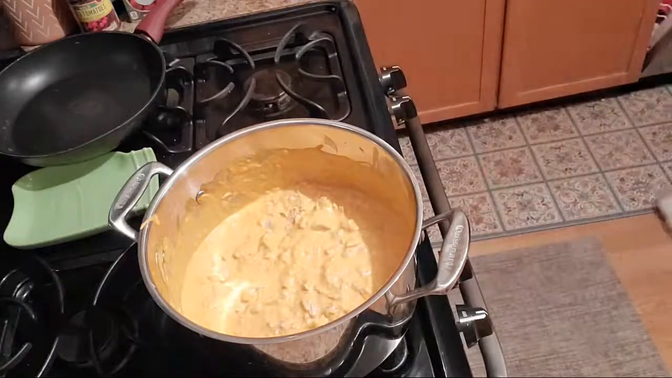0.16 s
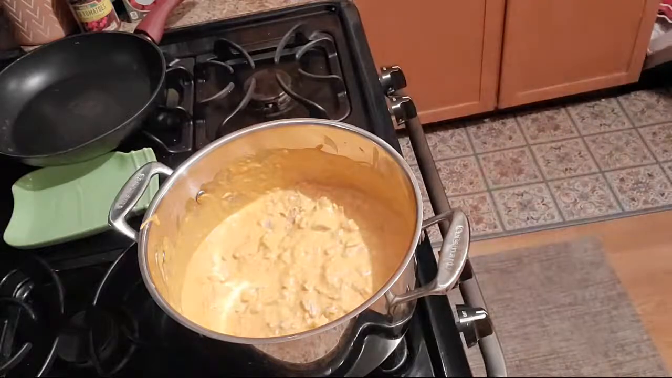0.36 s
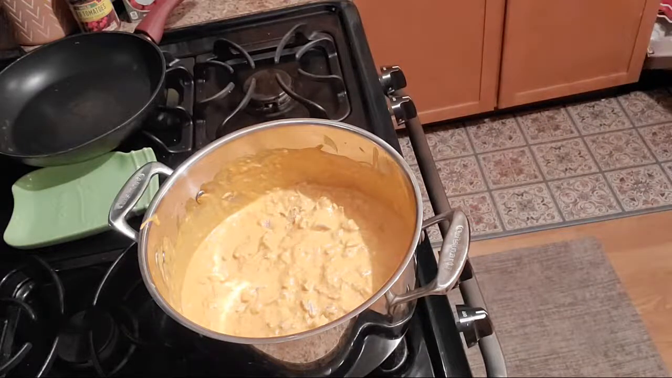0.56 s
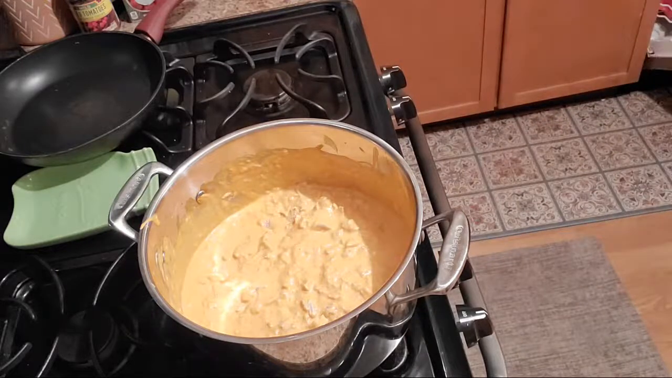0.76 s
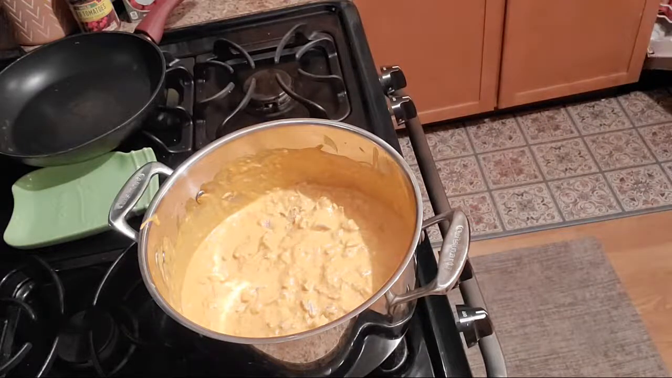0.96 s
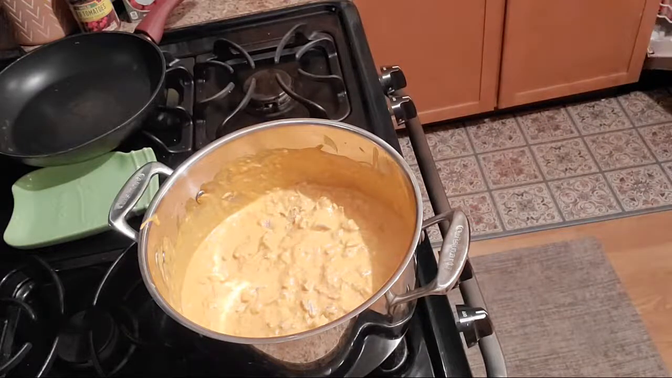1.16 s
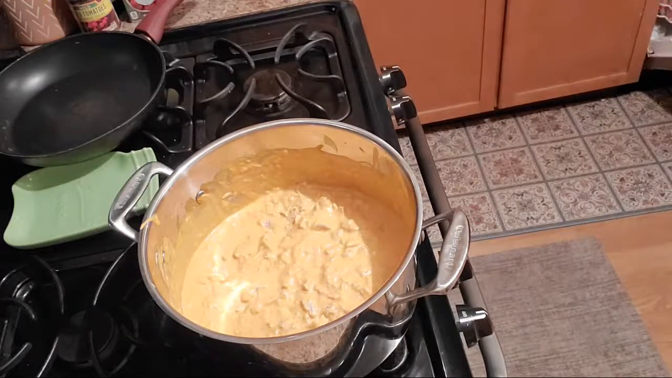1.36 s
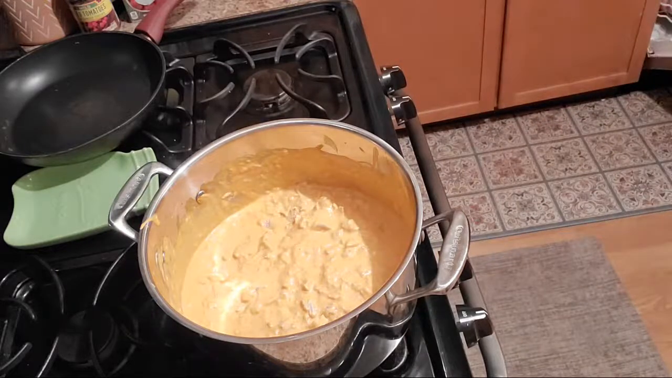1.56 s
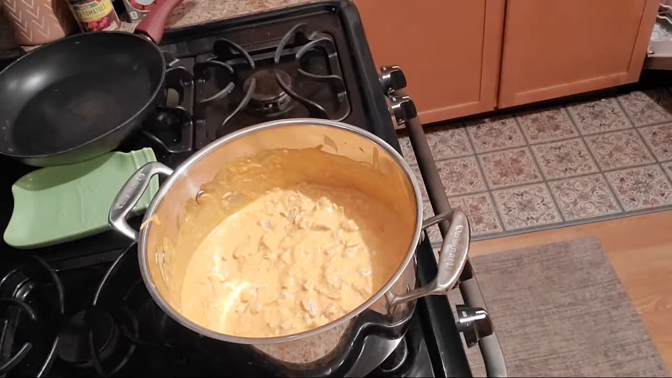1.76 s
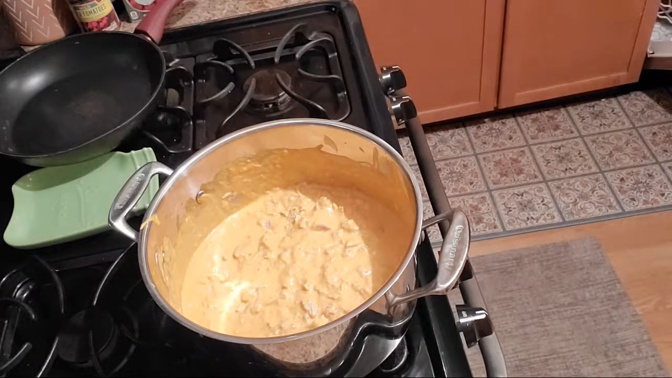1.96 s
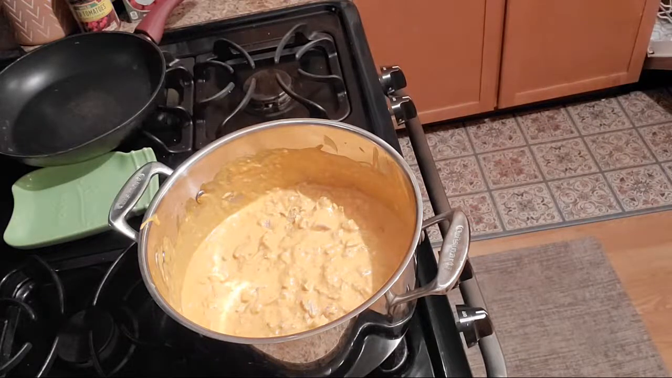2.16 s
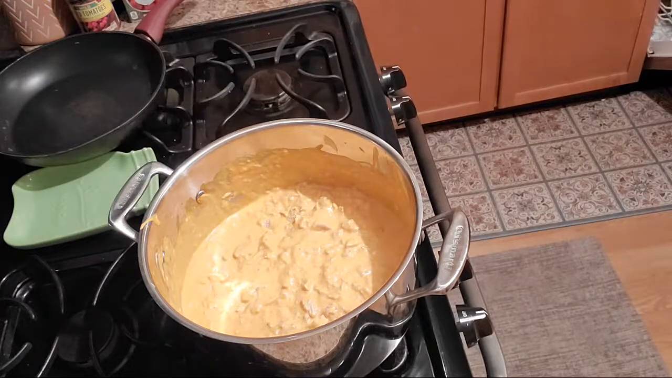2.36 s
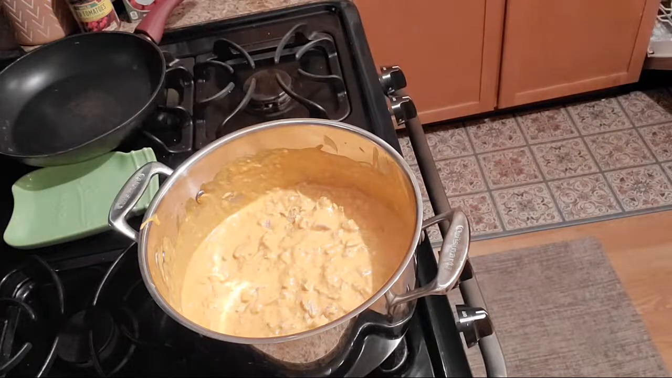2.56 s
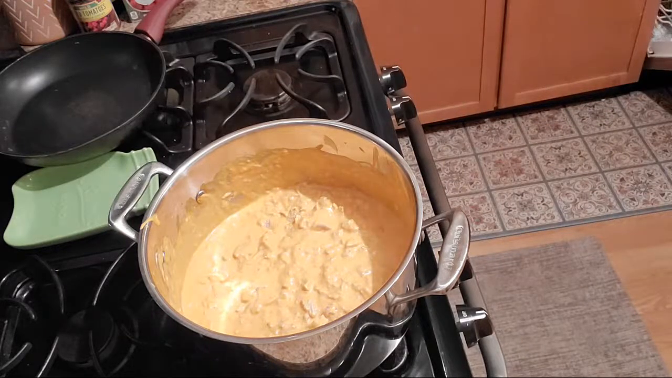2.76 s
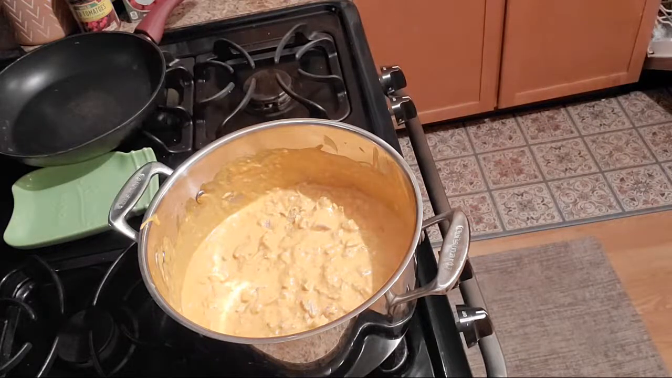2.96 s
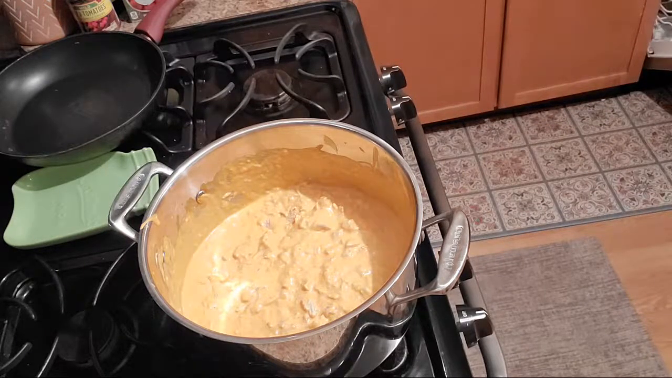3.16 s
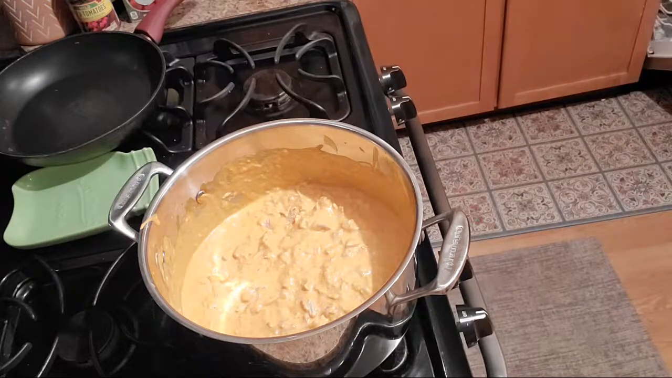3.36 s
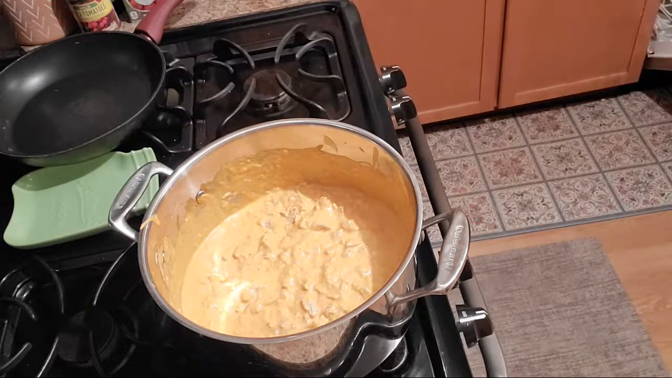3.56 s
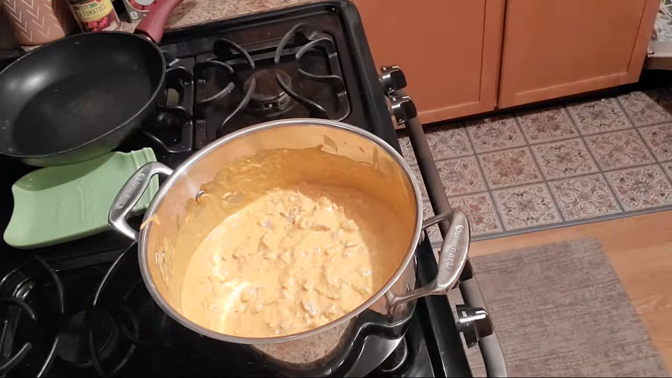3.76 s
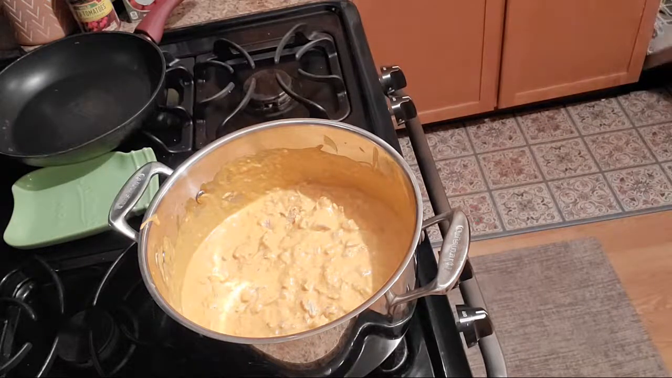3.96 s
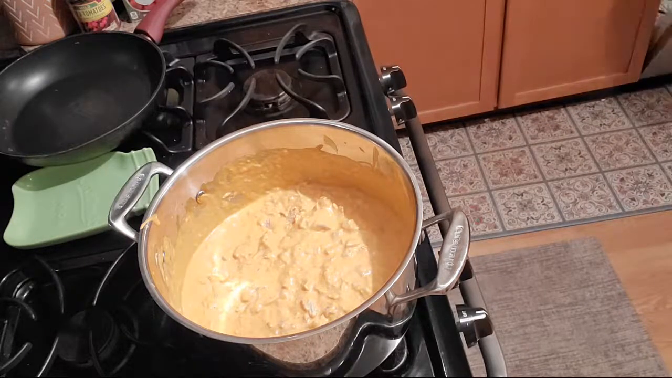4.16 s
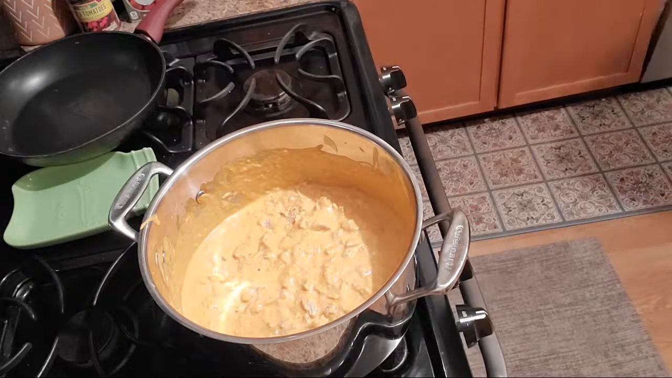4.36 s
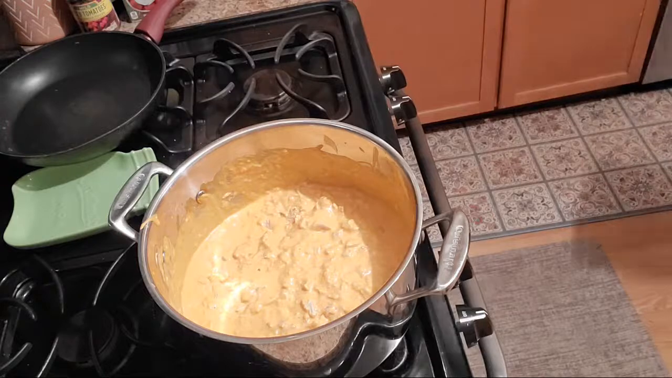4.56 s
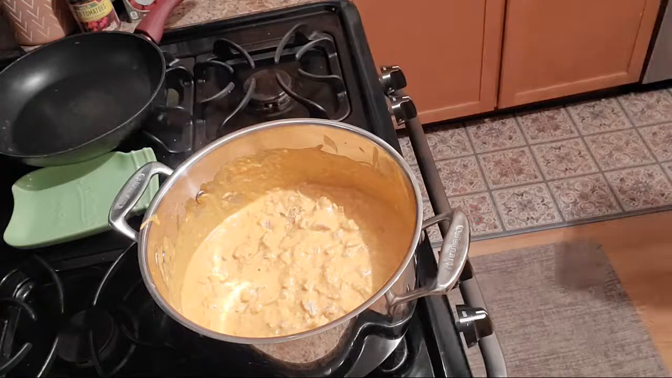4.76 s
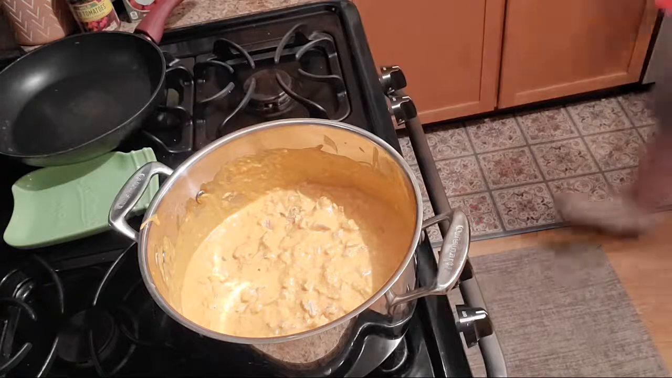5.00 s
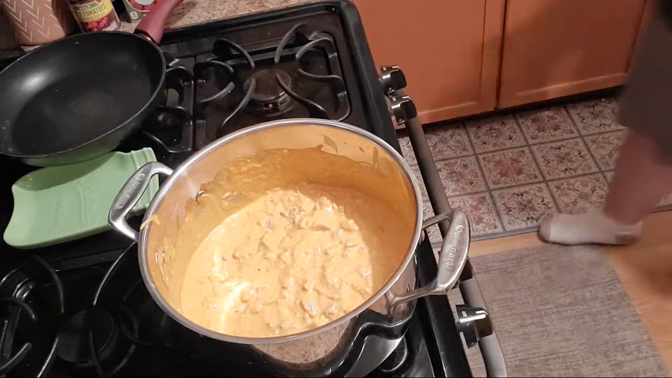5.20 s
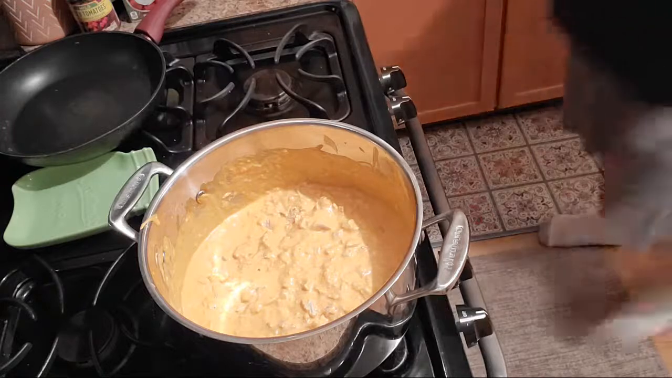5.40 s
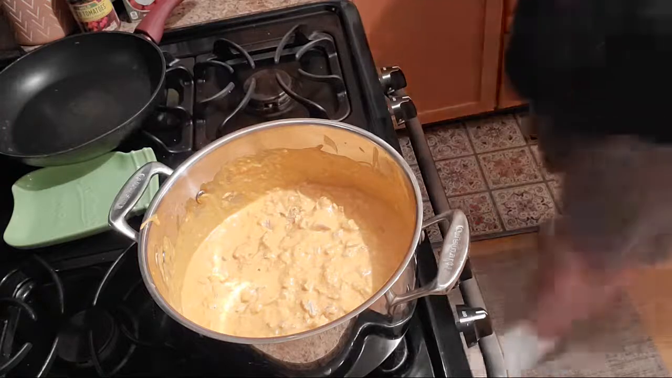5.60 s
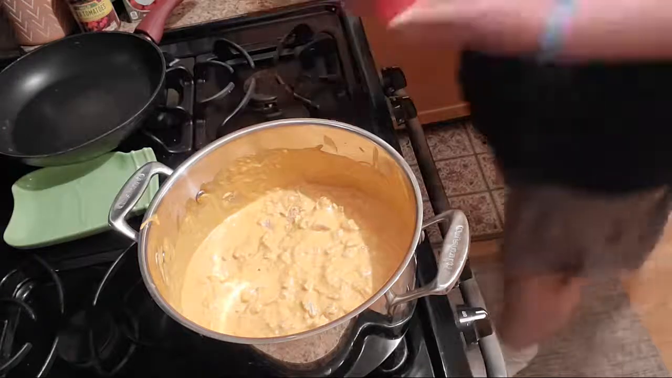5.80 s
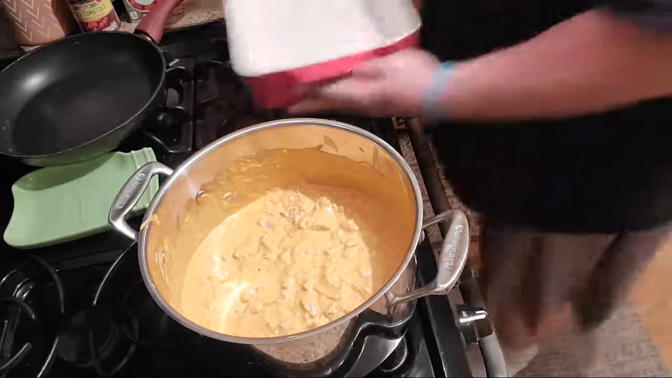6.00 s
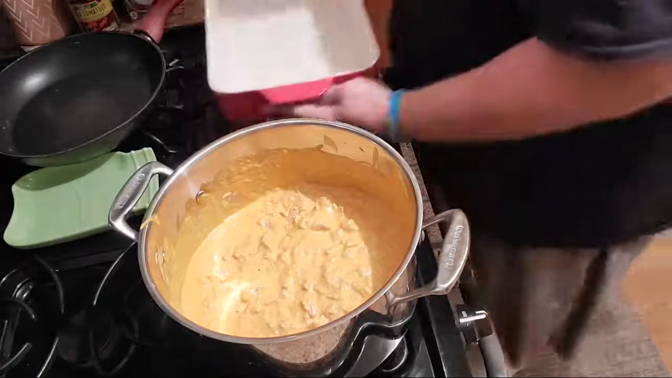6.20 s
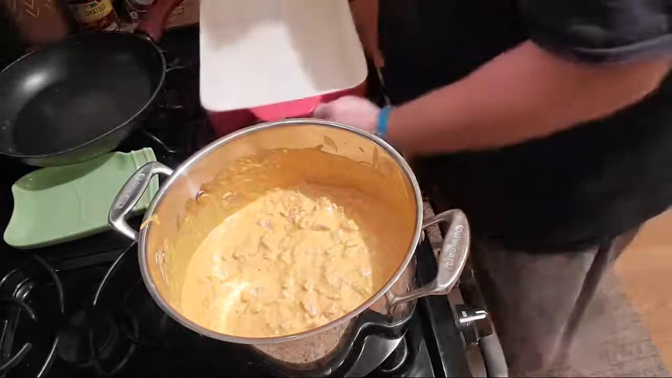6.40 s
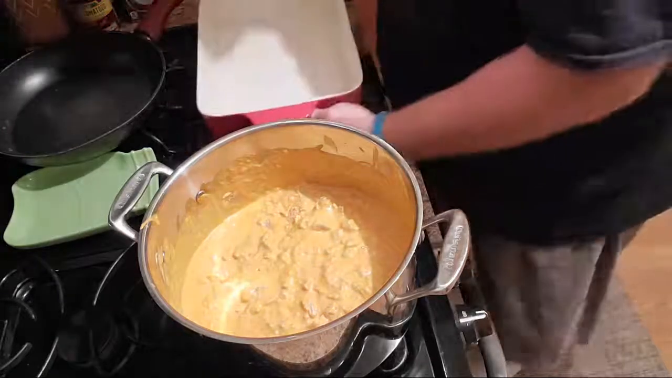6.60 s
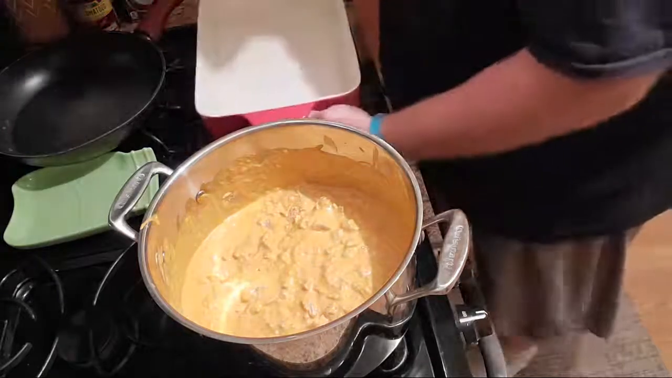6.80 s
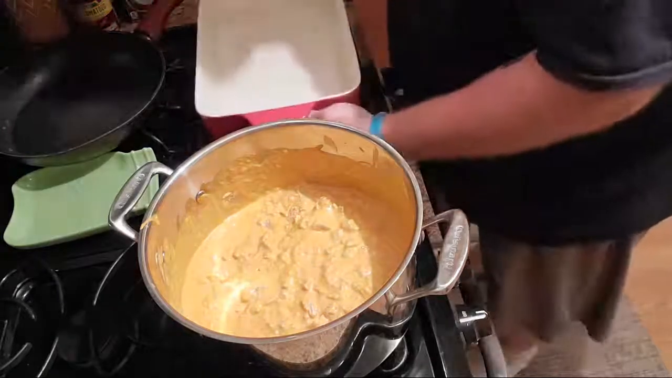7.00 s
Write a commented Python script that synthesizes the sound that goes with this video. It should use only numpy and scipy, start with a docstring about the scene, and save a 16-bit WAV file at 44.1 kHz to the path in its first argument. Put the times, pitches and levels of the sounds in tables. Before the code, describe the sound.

A quiet small kitchen with a soft low rush of air, a faint unsteady hum and barely audible hiss. From 0 to 0.4 seconds there are faint slides, a thin squeak and small dish taps in a low cupboard a few metres away. Muffled crockery clacks come in little groups around 0.8, 1.1, 1.45 and 2.0 seconds, with short scrapes from 2.3 to 2.8. Knocks gather near 3.0, and at 3.3 to 3.6 a louder run of clearer, hard clunks arrives over low bumps. A wooden door bangs sharply at 3.9, something slides, smaller bumps follow at 4.3, and a second door shuts at 4.5 with a deep cupboard boom and slight rattles until 4.8. Near quiet follows. At 6.47 a ceramic baking dish strikes the iron stove grate, loud and close, with a brief clang; duller settling knocks follow at 6.6 and 6.75, decaying into room air.

```python
"""A small kitchen: a ceramic baking dish is dug out of a low cupboard, a few metres from the microphone.
Dishes clack and doors shut as coloured pulses, each with dense decaying echoes; slides are random slips.
Decaying modes give the boom of the cupboard and the clang of the dish set down on the iron stove grate.
Filtered noise makes the rush of air and faint high hiss; unsteady sines make the low hum and thin squeaks."""
import sys
import numpy as np
from scipy import signal
from scipy.fft import rfft, irfft
from scipy.io import wavfile
from scipy.ndimage import uniform_filter1d, map_coordinates

SR = 44100
rng = np.random.default_rng(int(sys.argv[2]) if len(sys.argv) > 2 else 0)


def file_out(sig):
    """Save sig as 16-bit WAV at sys.argv[1]."""
    # one column per channel
    cols = np.atleast_2d(sig).T
    # limit, then scale
    lim = np.clip(cols, -1, 1)
    pcm = np.round(lim * 32767).astype(np.int16)
    wavfile.write(sys.argv[1], SR, pcm)


N = 310531
TIME = np.arange(N) / SR  # s, the whole scene
RING_TIME = np.arange(SR) / SR  # s, one second of decay

# All levels are relative.
# Spectrum of the steady air noise: [f/Hz, level/dB]
AIR_COLOUR = [(25, -21.5), (45, -6), (80, -6.5), (125, -10.5), (163, -1), (215, -13.5), (250, -4.5),
              (330, -5.5), (470, -9.5), (580, -21), (1100, -33), (2500, -48), (7700, -54.5), (16000, -45)]
# Faint fuzzy whines in the air noise: [f/Hz, width/Hz, level/dB]
AIR_PEAKS = [(1860, 71, 11), (3440, 320, 9)]
# Course of the air noise: [t/s, level/dB]
AIR_LEVEL = [(0, -48), (1.8, -51.5), (3, -49.5), (5.1, -50.5), (5.7, -51)]
# Partials of the hum, about which the level wavers: [f/Hz, level/dB]
HUM = [(163, -57), (296, -84.5)]
# Faint high hiss that swells and fades: [t of the middle/s, length/s, level/dB]
HISS_SWELLS = [(0.173, 0.48, -71.5), (0.38, .16, -68.5), (0.66, 0.71, -68.5), (1.23, .36, -76.5),
               (4.23, 0.87, -63), (5.25, 0.21, -67), (5.538, 0.46, -71.5), (5.937, 0.48, -76.5),
               (6.24, .1, -76.5), (6.73, 0.27, -68.5)]
# Spectrum of the high hiss: [f/Hz, level/dB]
HISS_COLOUR = [(7500, -35.5), (9300, -3), (11300, 1.5), (12500, -1), (16000, -1)]
# Thin squeaks: [t of the middle/s, length/s, level/dB, f/Hz]
SQUEAKS = [(0.145, 0.19, -74, 3090), (0.644, 0.32, -77, 3480)]
# Things sliding on the shelf: [t/s, length/s, level/dB]
SLIDES = [(0.04, 0.3, -62), (0.302, 0.19, -56.5), (2.291, 0.18, -54.5), (2.547, 0.11, -56.5),
          (2.636, 0.14, -55), (3.826, .1, -51), (4.147, 0.19, -51), (4.278, 0.032, -43), (4.3, 0.14, -67)]
# Spectrum of the slips: [f/Hz, level/dB]
SLIDE_COLOUR = [(200, 14), (600, 25), (1100, 10), (1800, -3), (3000, -12), (5000, -26), (8000, -26.5),
                (16000, -32.5)]
# Doors bump and shut: [t/s, level/dB, treble loss/(dB per octave), bass weight/dB, f of the part touched/Hz]
DOOR_BLOWS = [ (3.916, -12, 11.5, -18, 1385), (3.930, -11.5, 8.5, -33, 355),
              (3.964, -22.5, 7.5, -10.5, 1830), (4.208, -39, 9, -27, 2550), (4.279, -20.5, 19.5, -31, 660),
              (4.321, -33.5, 7.5, -32.5, 1990), (4.353, -33.5, 6.5, -9.5, 1820),
              (4.486, -27.5, 3.5, -12, 3100), (4.491, -13.5, 16.5, -18, 712), (4.515, -17, 8.5, -18.5, 628),
              (4.699, -35.5, 5.5, -3.5, 10700), (4.794, -32, 6.5, -20, 2530)]
# Spectrum of a door blow: [f/Hz, level/dB]
DOOR_COLOUR = [(30, -18), (60, 21.5), (130, 24), (260, 13), (500, 7), (750, 3), (1200, 0.5), (2000, 0),
               (3200, 0), (5000, -0.5), (7000, -6), (11500, 7), (16000, 6.5)]
# Broad resonances of the doors: [f/Hz, width/Hz, level/dB]
DOOR_PEAKS = [(122.6, 20.1, 2.84), (234, 21, 10.2), (355, 10, 2.6), (512, 92, 2.1), (598, 29, 1.3),
              (717, 14, 4.87)]
# Heavy bumps that shake cupboard and floor: [t/s, level/dB, f above which the push softens/Hz]
THUDS = [(3.111, -31, 158), (3.170, -31, 108), (3.375, -30, 120), (3.922, -36.5, 260), (4.284, -38.5, 130),
         (4.497, -17.5, 130), (4.544, -15.5, 88), (4.672, -40, 91)]
# Modes of the cupboard and floor: [f/Hz, level/dB, t60/s]
CUPBOARD_MODES = [(57.7, -22, 0.6), (66.9, -4.5, 0.63), (81.3, -1.5, 0.47), (96.9, -14, 0.36),
                  (114.6, 6.5, 0.58), (130, -13.5, 0.48), (149.9, -1, 0.31), (225.3, -2, 0.44)]
# Dishes knock together, and at 3.094 s a door knocks: [t/s, level/dB, treble loss/(dB per octave), bass
# weight/dB, f of the part touched/Hz]
CROCKERY_BLOWS = [ (0.236, -52, 9, -2, 1150), (0.284, -38.5, 13, -5, 2440), (0.781, -36.5, 9, -7.5, 2930),
                  (0.830, -29.5, 4, -9.5, 3090), (0.879, -25.5, 12, -15.5, 2200),
                  (1.081, -33, 25.5, -17, 1150), (1.393, -32.5, 9, -11, 3800), (1.443, -22, 12.5, -23, 590),
                  (1.487, -31, 7, -5, 3560), (1.929, -43, 7, -12, 3050), (1.991, -21, 7.5, -34, 2580),
                  (2.023, -27.5, 6, -8, 480), (2.079, -32.5, 7.5, -2, 2330), (2.222, -41, 12.5, -14, 624),
                  (2.752, -34, 14.5, -31, 1860), (2.818, -33.5, 19, -28, 1860),
                  (2.947, -40.5, 8, -20, 5450), (2.991, -40, 3, -5, 6050), (3.024, -27.5, 13.5, -22, 650),
                  (3.094, -24, 7.4, 6, 254), (3.122, -25.5, 7.5, -18, 640),
                  (3.309, -14.5, 10.5, -37.5, 1040), (3.315, -11, 9.5, -34.5, 520),
                  (3.367, -15, 7, -8.5, 875), (3.388, -19, 6, -17, 11800), (3.456, -25, 6, -14.5, 1100),
                  (3.540, -17, 9.5, -22, 417), (3.579, -17.5, 8, -18, 1468), (3.618, -45, 1, 13.5, 11600)]
# Spectrum of a crockery blow: [f/Hz, level/dB]
CROCKERY_COLOUR = [(30, 8.5), (60, 12.5), (130, 18.5), (260, 10), (500, 8), (750, 3), (1200, 2),
                   (2000, 1.5), (3200, 4.5), (5000, -3), (7000, -10), (11500, 10.5), (16000, 12)]
# Broad resonances of the crockery: [f/Hz, width/Hz, level/dB]
CROCKERY_PEAKS = [(480, 17, 0.5), (670, 49, 6), (882, 22, 6.5), (1870, 98.5, 2), (2700, 160, 0),
                  (3100, 120, 0), (3800, 100, 1.5)]
# Dimming of the very top while the dishes lie deep in the cupboard: [f/Hz, level/dB]
DEEP_MUFFLE = [(9500, -0.5), (16000, -16)]
# Dish knocks on the grate: [t/s, level/dB, treble loss/(dB per octave), bass weight/dB, f of the part touched/Hz]
GRATE_BLOWS = [ (6.468, -0.5, 14.5, -29.5, 586), (6.474, -14, 6.5, -21, 1870),
               (6.578, -14.5, 16.5, -19.5, 227), (6.744, -25.5, 17, -9.5, 1270)]
# Spectrum of a blow on the grate: [f/Hz, level/dB]
GRATE_COLOUR = [(30, 0), (60, 5.5), (130, 25), (260, 8), (500, -0.5), (750, 1.5), (1200, -1), (2000, 3.5),
                (3200, 2), (5000, 1.5), (7000, -5.5), (11500, 7.5), (16000, 16)]
# Broad resonances of the grate blows: [f/Hz, width/Hz, level/dB]
GRATE_PEAKS = [(378, 40, 3.4), (481, 31, 9.6), (1200, 70, 5.9), (2200, 55, 3), (3100, 300, 7.6),
               (3740, 91, 12), (4800, 150, 3.9)]
# Strikes that excite the baking dish: [t/s, level/dB]
DISH_STRIKES = [(6.468, -24), (6.482, -12.5)]
# Modes of the baking dish: [f/Hz, level/dB, t60/s]
DISH_MODES = [(650, -23.5, 0.17), (702, -25.5, 0.33), (896, 6.5, 0.2), (973, -13, 0.44), (1168, -13, 0.22),
              (1200, -20.5, 0.23), (1510, -13.5, 0.11), (1630, -29, 0.34), (1880, -23.5, 0.22),
              (1974, -17, 0.19), (2207, -15, 0.24), (2340, -30, .27), (2573, -29.5, 0.45),
              (3000, -24.5, 0.21), (3050, -28.5, .2), (3790, -21, 0.17), (4630, -25, 0.22)]
# Modes of the steel stove top: [f/Hz, level/dB, t60/s]
STOVE_MODES = [(84, -23.5, 0.56), (121.5, -19, 0.66), (163.7, -15, 0.67), (227, -5.5, 0.23),
               (360, -20.5, 1), (426, -12, 0.4), (505, -15.5, 0.52), (517, 0.5, 0.049)]
# Reverberation before each source's linger factor: [f/Hz, t60/s]
ROOM = [(60, 0.91), (150, 0.51), (350, 0.55), (800, 0.41), (1800, 0.42), (3500, 0.36), (7000, 0.42),
        (14000, 0.26)]
# Response of the microphone: [f/Hz, level/dB]
MICROPHONE = [(20, 1), (5500, -0.5), (7000, -2), (7850, -9.5), (8400, -2), (9300, 1.5), (16000, -4)]

EDGE_HZ = 16000  # upper band limit
KNEE_HZ, BASS_HZ = 1100, 264  # contacts lose treble above the knee; weight tells below the bass corner
PART_WIDTH_HZ, PART_WIDTH_SHARE = 30, 0.11  # resonance width of the touched part: base, share of its pitch
OVERTONE, OVERTONE_SHARE = 1.49, 0.56  # its second mode: ratio of pitch, share of the first mode's dB lift
DEEP_UNTIL_S = 2.97  # until then the dishes lie deep in the cupboard
SLIDE_ATTACK_S, SLIDE_FADE_DB = 0.012, -8.5  # onset of a slide, and its change of level by the end
SLIPS_PER_S = 500
SQUEAK_JITTER_RAD, SQUEAK_JITTER_PER_S = 1.2, 170  # rms phase wander and its rate
SQUEAK_FLICKER_DB, SQUEAK_FLICKER_PER_S = 4.5, 45  # rms level wander and its rate


def amp(db):
    """Level: an amplitude ratio is ten to the power of dB/20."""
    return 10 ** (np.asarray(db) / 20)


def unit(x):
    """Normalisation: division by the root mean square gives rms 1."""
    return x / np.sqrt(np.mean(x ** 2) + 1e-20)


def read(points, hz):
    """Logarithmic frequency scale: (f/Hz, value) points are interpolated along it."""
    f, value = np.transpose(sorted(map(tuple, points)))
    return np.interp(np.log(hz + 1), np.log(f + 1), value)


def follow(rows):
    """Envelope: (t/s, level/dB) rows become a gain over time."""
    return amp(np.interp(TIME, *np.transpose(rows)))


def add(mix, s, sound):
    """Superposition: a sound is summed into the mix from time s."""
    part = mix[max(round(s * SR), 0):][:len(sound)]
    part += sound[:len(part)]


def wander(x):
    """Random fluctuation: rms 1, linear between random values at each whole x."""
    return unit(map_coordinates(rng.standard_normal(1000), [x], order=1, mode="wrap"))


def swell(middle, length):
    """Envelope: half a cosine period makes one arch."""
    return np.cos(np.pi * np.clip((TIME - middle) / length, -0.5, 0.5))


def resonance_db(peaks, hz):
    """Resonance: each (f/Hz, width/Hz, level/dB) peak lifts the dB curve as a Lorentzian."""
    return sum(db / (1 + (2 * (hz - f) / width) ** 2) for f, width, db in peaks)


def tint(x, colour, peaks=()):
    """Linear filtering: a spectrum and optional resonances shape x, at rms 1."""
    hz = np.fft.rfftfreq(len(x), 1 / SR)
    gain = amp(read(colour, hz) + resonance_db(peaks, hz))
    return unit(irfft(rfft(x) * gain, len(x)))


def ring(modes, rise):
    """Modal decay: exponentially dying sines build up with time constant rise."""
    decay = sum(amp(db - 60 * RING_TIME / t60) * np.sin(2 * np.pi * hz * RING_TIME)
                for hz, db, t60 in modes)
    return decay * (1 - np.exp(-RING_TIME / rise))


def contact_db(hz, dullness, weight):
    """Contact mechanics: softer contacts lose more treble, heavier ones push more bass."""
    bass = weight / (1 + (hz / BASS_HZ) ** 2)
    treble_loss = dullness * np.log2(np.hypot(1, hz / KNEE_HZ))
    return bass - treble_loss


def click(gain):
    """Minimum phase: the Hilbert transform of log gain yields the most compact causal pulse."""
    both_sides = np.r_[gain, gain[-2:0:-1]]
    log_gain = np.log(np.maximum(both_sides, 1e-5))
    return np.fft.ifft(np.exp(np.conj(signal.hilbert(log_gain)))).real


def kitchen(gain, rise, linger):
    """Reverberation: dense echoes decay at a rate set by band, and the bass builds up slowly."""
    hz = np.fft.rfftfreq(SR, 1 / SR)
    # echoes crowd together with time
    taps = rng.standard_normal(SR) * (rng.random(SR) < 0.12 + 8 * RING_TIME)
    taps /= np.sqrt(uniform_filter1d(taps ** 2, 256) + 1e-6)
    # early ones arrive in clusters
    taps *= amp(0.5 * wander(RING_TIME * 220) * np.exp(-RING_TIME / 0.12))
    # the room adds a fine ripple but favours no broad band
    early = unit(np.exp(-RING_TIME / 0.05)) / np.sqrt(SR)
    broad = np.sqrt(uniform_filter1d(abs(rfft(taps * early)) ** 2, size=130))
    spectrum = rfft(taps) * gain / broad
    out = np.zeros(SR)
    for k, (centre, t60) in enumerate(ROOM):
        share = read([(f, j == k) for j, (f, _) in enumerate(ROOM)], hz)
        build = 1 - np.exp(-RING_TIME / (rise + 1.1 / centre))
        decay = amp(-60 * RING_TIME / (t60 * linger))
        out += irfft(spectrum * share, SR) * build * decay
    return out


def room_echo(rise, linger):
    """Impulse response: the room's answer to a flat pulse, at unit energy."""
    echo = kitchen(np.ones(SR // 2 + 1), rise, linger)
    return echo / np.linalg.norm(echo)


def blows(rows, colour, peaks, ring_db, direct_db, rise, linger):
    """Impact excitation: the struck body colours a pulse, heard directly and through the room."""
    hz = np.fft.rfftfreq(SR, 1 / SR)
    out = np.zeros(N)
    body_db = read(colour, hz) + resonance_db(peaks, hz)
    for s, strength_db, dullness, weight_db, pitch_hz in rows:
        width = PART_WIDTH_HZ + PART_WIDTH_SHARE * pitch_hz
        part_modes = [(pitch_hz, width, ring_db), (OVERTONE * pitch_hz, width, OVERTONE_SHARE * ring_db)]
        part_db = resonance_db(part_modes, hz)
        # every contact point favours other small modes, mostly in the treble
        spot_db = 2.6 * wander(32 * np.log(1 + hz / 1200)) * hz / (hz + 700)
        gain = amp(strength_db + body_db + contact_db(hz, dullness, weight_db) + part_db + spot_db)
        add(out, s, amp(direct_db) * click(gain) + kitchen(gain, rise, linger))
    return out


def background():
    """Stationary noise and periodic tone: filtered noise is a low rush of air under a wavering hum."""
    air = amp(-2.0) * follow(AIR_LEVEL) * tint(rng.standard_normal(N), AIR_COLOUR, AIR_PEAKS)
    hum = np.zeros(N)
    for hz, db in HUM:
        level = amp(db + 2.9 * wander(7 * TIME))
        hum += level * np.sin(2 * np.pi * hz * TIME + 0.27 * wander(9 * TIME))
    return air + hum


def hiss():
    """Filtered noise: faint high hiss swells and fades under soft arches."""
    envelope = sum(amp(db) * swell(s, length) for s, length, db in HISS_SWELLS)
    return amp(1) * envelope * tint(rng.standard_normal(N), HISS_COLOUR)


def squeaks():
    """Phase and amplitude modulation: random wander breaks up thin tones, perhaps from a hinge."""
    jitter = SQUEAK_JITTER_RAD * wander(SQUEAK_JITTER_PER_S * TIME)
    flicker_db = SQUEAK_FLICKER_DB * wander(SQUEAK_FLICKER_PER_S * TIME)
    out = np.zeros(N)
    for s, length, db, hz in SQUEAKS:
        out += amp(db + flicker_db) * swell(s, length) * np.sin(2 * np.pi * hz * TIME + jitter)
    return out


def sliding():
    """Stick-slip friction: tiny random slips of dishes on the shelf are blurred by the room."""
    pressure = np.zeros(N)
    for s, length, db in SLIDES:
        t = np.arange(0, length, 1 / SR)
        # a push, easing off towards the end
        add(pressure, s, np.minimum(t / SLIDE_ATTACK_S, 1) * amp(db + SLIDE_FADE_DB * t / length))
    slips = (rng.random(N) < SLIPS_PER_S / SR) * rng.standard_normal(N)
    scrape = tint(slips, SLIDE_COLOUR) * pressure
    return amp(2.0) * signal.fftconvolve(scrape, room_echo(rise=0.0019, linger=0.25))[:N]


def cupboard():
    """Impact and modal resonance: wooden doors bump and shut, and heavy bumps set the cupboard booming."""
    out = blows(DOOR_BLOWS, DOOR_COLOUR, DOOR_PEAKS, ring_db=10, direct_db=15.0, rise=0.001, linger=1.0)
    for s, db, soft_hz in THUDS:
        # a soft push excites the higher modes less
        pushed = [(hz, level - 10 * np.log10(1 + (hz / soft_hz) ** 4), t60)
                  for hz, level, t60 in CUPBOARD_MODES]
        add(out, s, amp(db) * ring(pushed, rise=0.012))
    return out


def crockery():
    """Impact of stacked dishes: the treble is dimmed deep inside the cupboard, then clear at its front."""
    front = blows(CROCKERY_BLOWS, CROCKERY_COLOUR, CROCKERY_PEAKS,
                  ring_db=8.5, direct_db=5, rise=0.003, linger=0.86)
    muffle = amp(read(DEEP_MUFFLE, np.fft.rfftfreq(N, 1 / SR)))
    deep = irfft(rfft(front) * muffle, N)
    return np.where(TIME < DEEP_UNTIL_S, deep, front)


def baking_dish():
    """Modal excitation: the dish lands, clangs briefly in the hand and settles; the stove top rings."""
    out = blows(GRATE_BLOWS, GRATE_COLOUR, GRATE_PEAKS,
                ring_db=7.5, direct_db=14.0, rise=0.00095, linger=0.78)
    clang = ring(DISH_MODES, rise=0.008)
    reflected = signal.fftconvolve(clang, room_echo(rise=0.006, linger=0.7))[:SR]
    clang = clang + amp(-13) * reflected
    for s, db in DISH_STRIKES:
        add(out, s, amp(db) * clang)
    add(out, DISH_STRIKES[0][0], amp(-12.5) * ring(STOVE_MODES, rise=0.0019))
    return out


def scene():
    """Superposition: all the sources add up in one channel."""
    surroundings = background() + hiss() + squeaks()
    handling = sliding() + cupboard() + crockery() + baking_dish()
    return (surroundings + handling)[None]


def record(dry):
    """Transducer response: the deepest bass is cut, the treble has a notch, and the band is limited."""
    highpass = signal.butter(5, 42, "highpass", fs=SR, output="sos")
    thinned = signal.sosfilt(highpass, dry)
    response = amp(read(MICROPHONE, np.fft.rfftfreq(N, 1 / SR)))
    coloured = irfft(rfft(thinned) * response, N)
    lowpass = signal.firwin(511, EDGE_HZ, window=("kaiser", 9), fs=SR)
    return signal.oaconvolve(coloured, lowpass[None], "same")


dry = scene()
out = record(dry)
file_out(out)
```